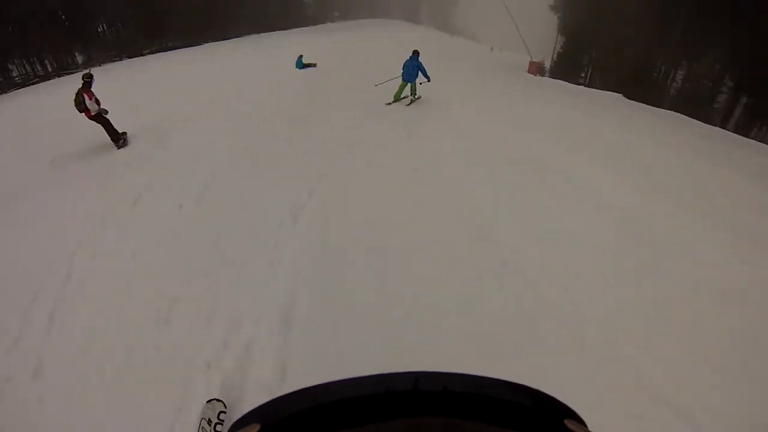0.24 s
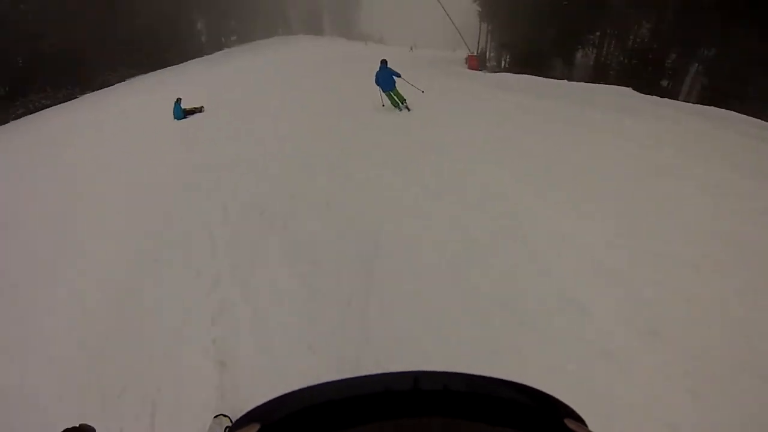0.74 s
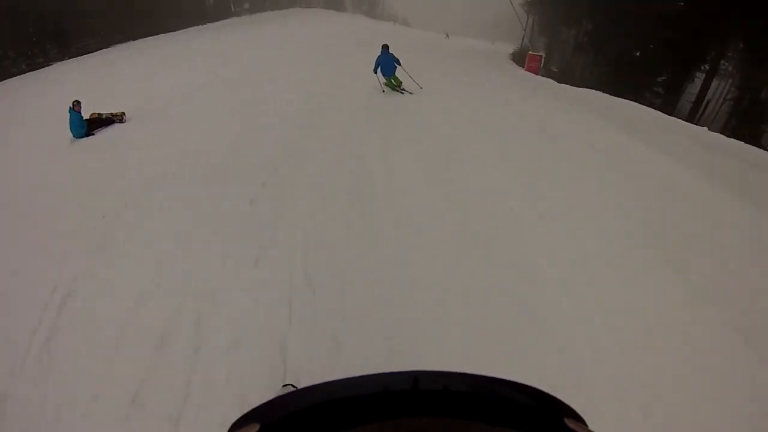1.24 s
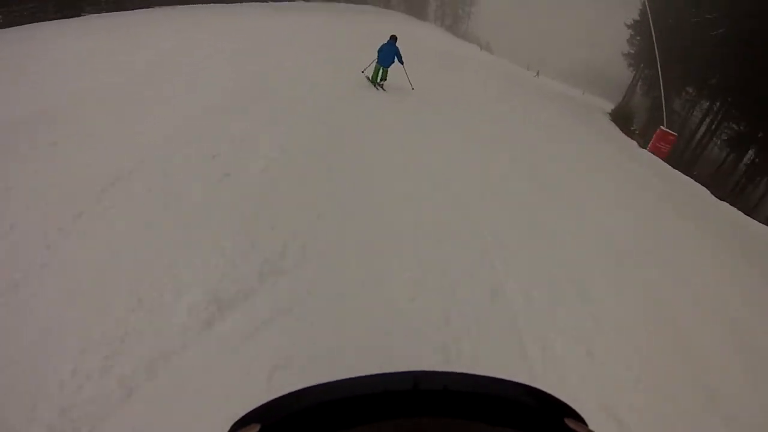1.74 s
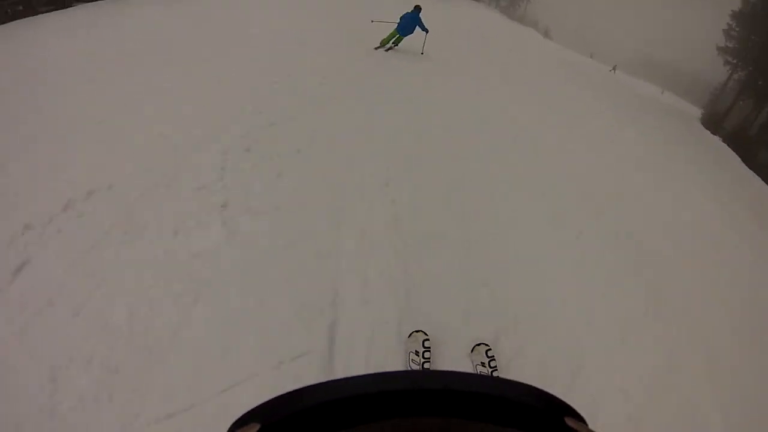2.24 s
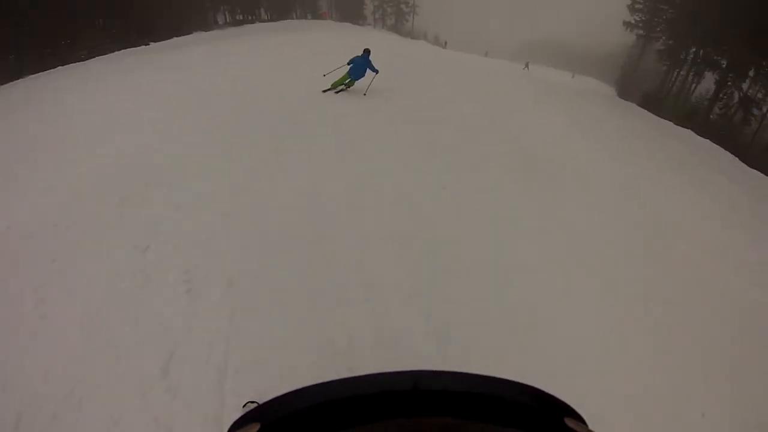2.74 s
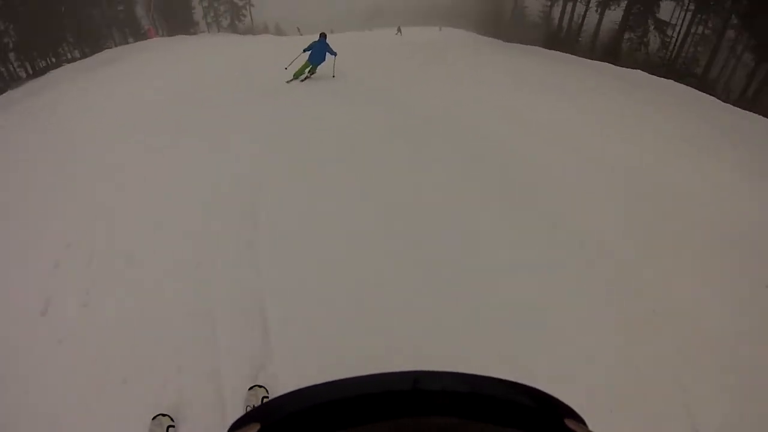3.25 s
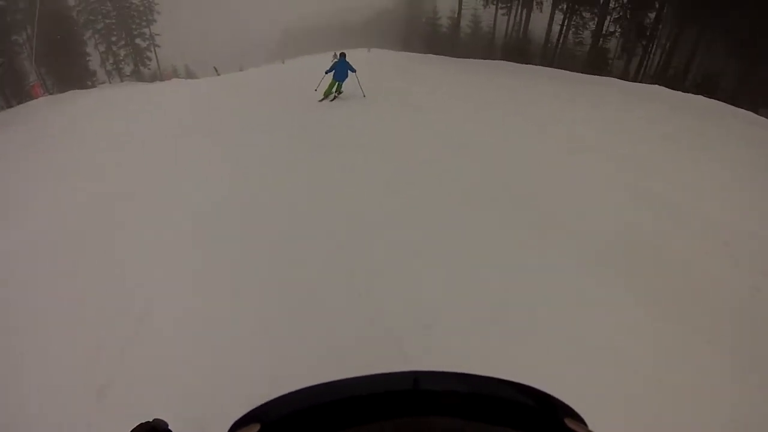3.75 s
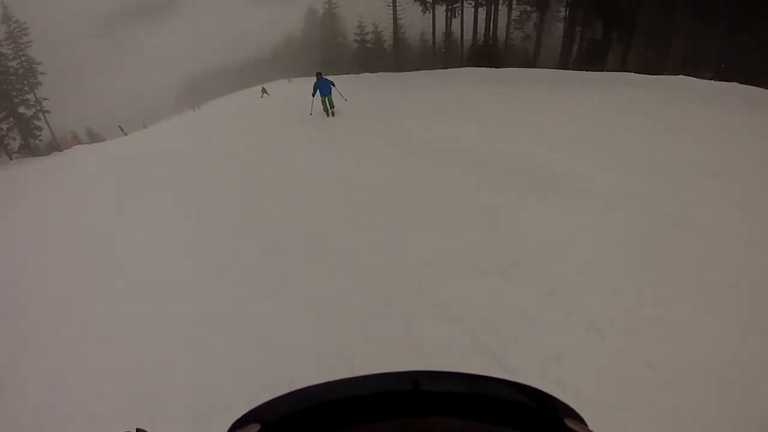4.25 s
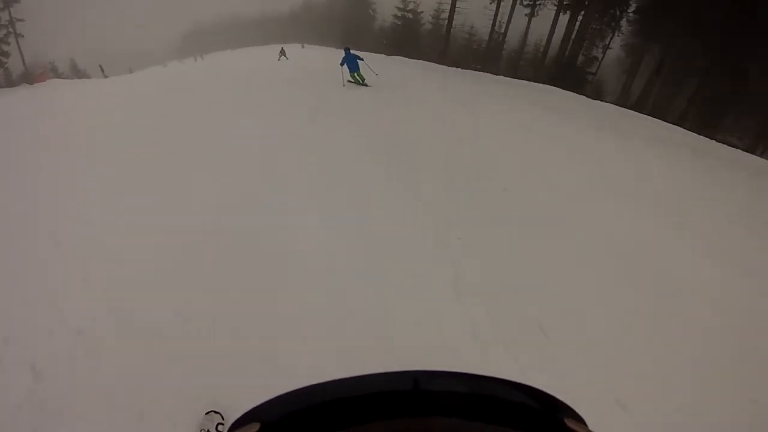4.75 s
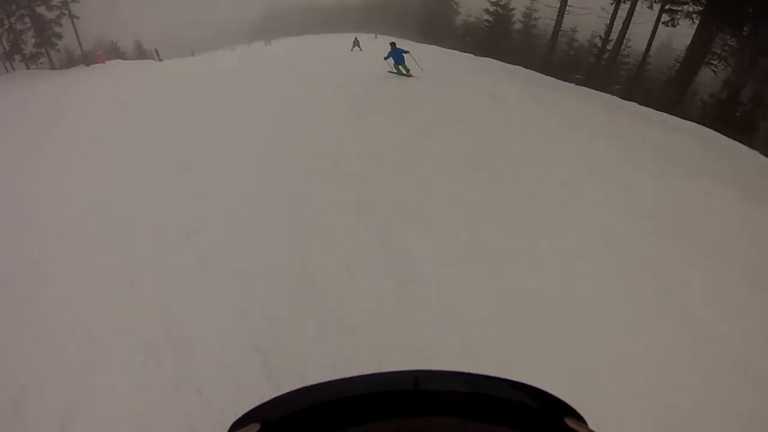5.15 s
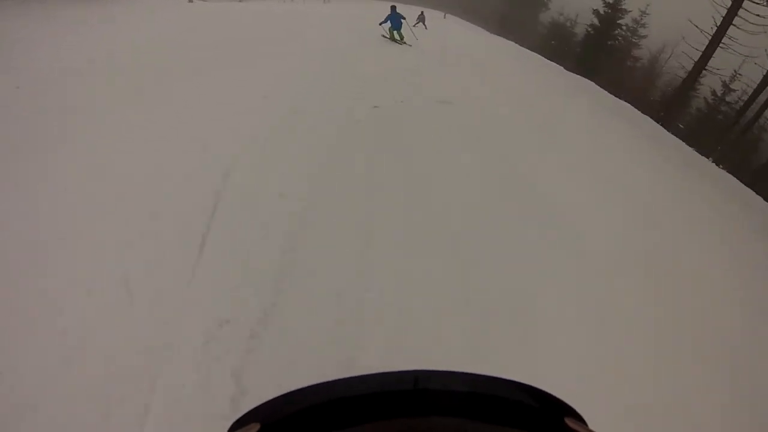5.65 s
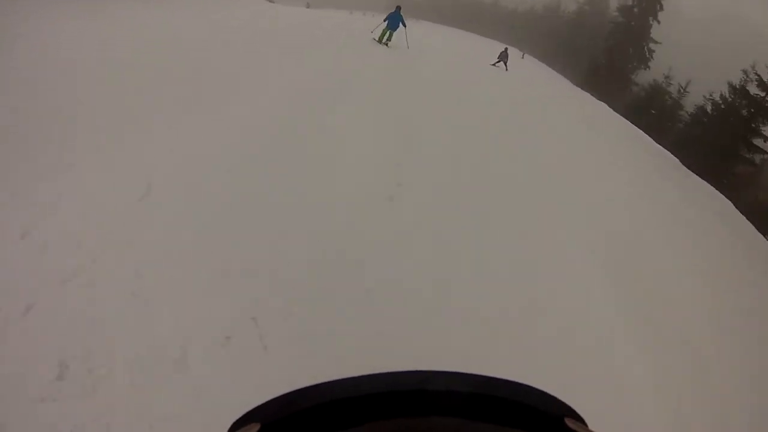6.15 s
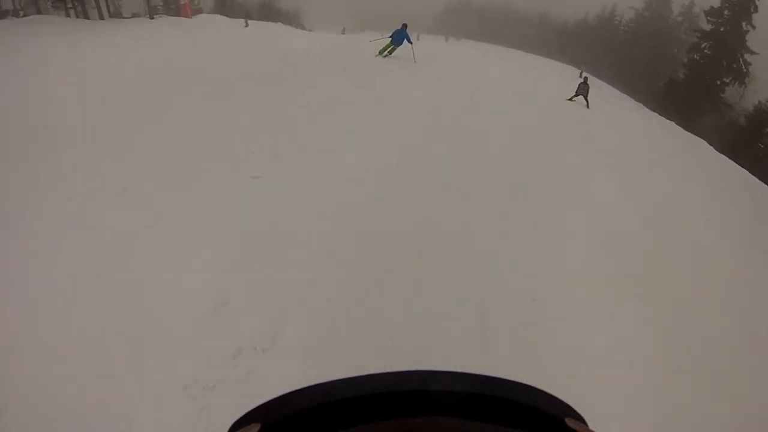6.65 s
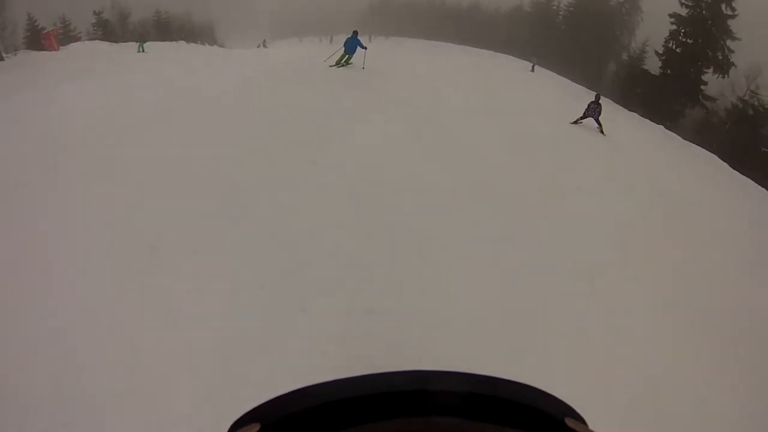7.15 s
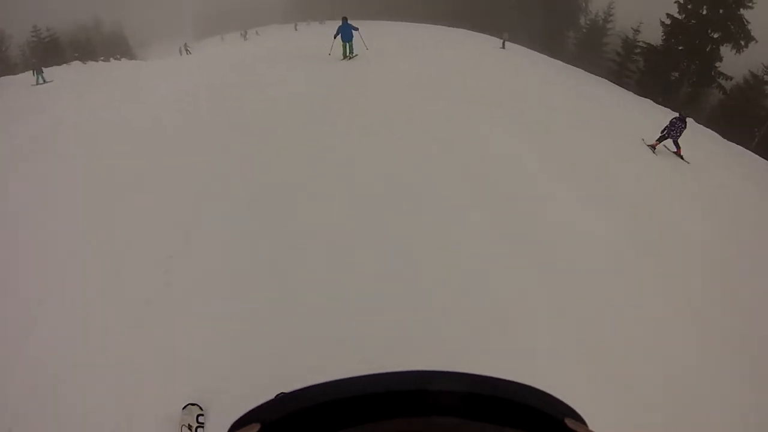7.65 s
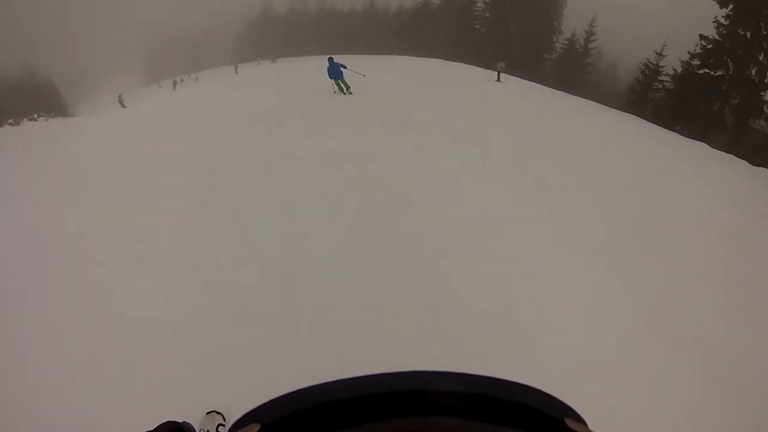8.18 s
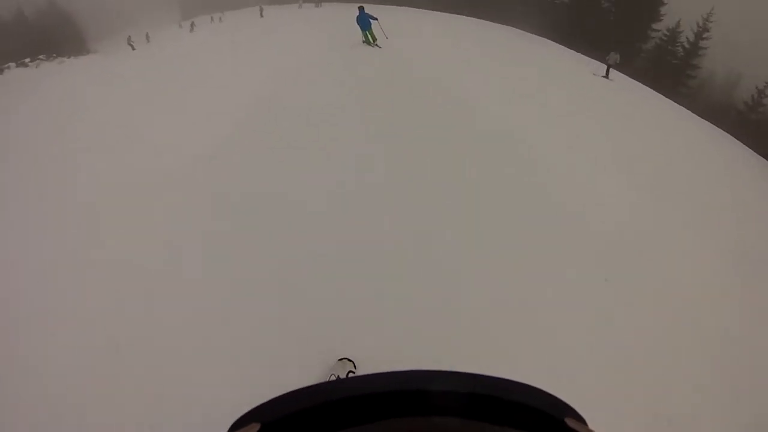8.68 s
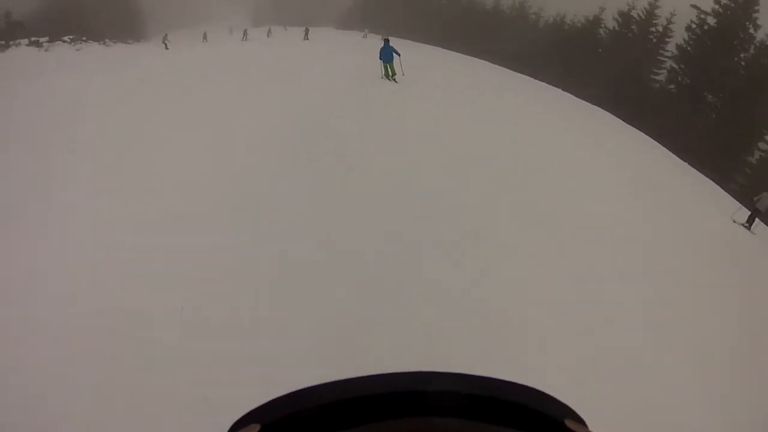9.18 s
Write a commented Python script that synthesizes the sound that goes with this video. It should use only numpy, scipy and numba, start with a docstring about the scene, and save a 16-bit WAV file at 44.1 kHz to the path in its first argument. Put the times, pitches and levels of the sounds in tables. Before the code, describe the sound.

A fast ski run on packed snow, heard from a camera in a closed case on the skier's helmet. The edges scrape and hiss without a break, sounding boxy and swelling briefly in the skids. Wind rumbles and shakes the mount, and irregular low thumps overload the microphone, making the sound dip and swell back. The thumps crowd together in the first four seconds, then come further apart. A faint hum and tiny ticks lie underneath.

```python
"""A slope of packed snow: a fast ski run, heard from a camera in a closed case on the skier's helmet.
Edges crush snow grains, scraping and hissing through the case's resonances; the bases scuff soft snow.
Wind buffets the case, shakes the mount, moans and makes the helmet shell hum; small ticks and sizzles
come through. Gusts and bumps jolt the case and overload the recorder: its stepped limiter ticks,
ducks the sound and lets it swell back."""
import sys
import numpy as np
from scipy import signal
from scipy.fft import rfft, irfft, next_fast_len
from scipy.io import wavfile
from scipy.ndimage import uniform_filter1d
from numba import njit

SR = 44100
rng = np.random.default_rng(int(sys.argv[2]) if len(sys.argv) > 2 else 0)


def dump_mix(stems):
    """Bounce the given channels to the path in sys.argv[1] as a 16-bit WAV at rate SR."""
    frames = np.atleast_2d(stems).T  # one column per channel
    limited = np.clip(frames, -1, 1)  # hard clip at full scale
    pcm = np.round(limited * 32767).astype(np.int16)
    wavfile.write(sys.argv[1], SR, pcm)


N = 415422
TIME_S = np.arange(N) / SR
BINS_HZ = np.fft.rfftfreq(next_fast_len(N), 1 / SR)

# Edge pressure on the snow. Each row: time in seconds, scrape level in dB, fizz re scrape in dB.
EDGE_PRESSURE = [(0.0, -34.5, -17), (0.38, -35.5, -14.5), (0.47, -38, -16), (0.95, -38, -17),
                 (1.63, -33.5, -15.5), (2.36, -37, -16.5), (2.61, -34.5, -16.5), (3.12, -37.5, -15.5),
                 (3.25, -42, -14), (4.03, -39.5, -15), (4.76, -37.5, -17), (5.35, -39.0, -16.5),
                 (6.42, -34.5, -17), (6.89, -38.7, -16.1), (7.23, -37.0, -17.5), (7.48, -39.3, -19),
                 (7.59, -35.5, -16.5), (9.42, -38.5, -17)]
# Skids as an edge is set. Each row: time in seconds, lift in dB.
EDGE_SKIDS = [(.63, 4), (1.16, 3.5), (3.35, 4.5), (3.64, 3.5), (4.92, 0.5), (5.04, 2), (5.92, 2.5),
              (7.04, 1.5), (8.28, 3), (9.41, 2)]
# Edge bite, positive when carving, negative on flat skis. Each row: time in seconds, bite in dB.
EDGE_BITE = [(0, -3.5), (1.15, -1.5), (1.45, 2.5), (2.5, 2), (2.9, -4), (3.8, -1.5), (4.95, -1.5),
             (5.25, 2), (6.1, 1.5), (7.1, 2.5), (7.45, -1.5), (8.15, -3), (8.65, 3), (9.42, -0.5)]
# Hardest carve, ringing the case's main resonance. Each row: time in seconds, lift in dB.
HARD_CARVE = [(6.25, 2.5)]
# Snow scrape through the case. Each row: frequency in Hz, relative density in dB.
SCRAPE_SPECTRUM = [(120, -18.5), (300, -14), (620, -14), (1050, -14), (1220, -6), (1520, -2.5), (1780, -8),
                   (2850, -14.5), (3330, -13.5), (3600, -21.5), (6900, -28), (8000, -33.5), (9800, -40.5),
                   (15500, -41.5)]
# Case resonances. Each row: frequency in Hz, width in Hz, lift in dB.
CASE_MODES = [(755, 72, 6.5), (943, 37, 7.5), (1139, 27, 9.5), (1357.5, 53, 2.5), (1521, 280, 2.5),
              (2080, 18, 0.5), (2393, 340, 6.5), (3046, 40, 5.5), (4380, 140, 4), (5032, 570, 6.5),
              (6590, 500, 3), (10700, 1500, 4)]
# Airstream on the helmet. Each row: time in seconds, relative shudder level in dB.
AIRSTREAM = [(0.0, -33), (1.2, -25.5), (1.33, -38), (1.63, -34), (3.63, -27), (4.11, -33.5), (4.28, -27),
             (4.45, -32.5), (6.3, -30), (6.59, -36.5), (6.9, -27.5), (8.43, -33), (8.56, -24.5),
             (9.42, -30)]
# Gusts shaking the mount. Each row: time in seconds, lift in dB.
WIND_GUSTS = [(.32, 5), (.87, 5), (2.14, 9), (2.54, 8), (3.8, 6), (4.68, 4), (7.3, 3.5), (8.3, 6.5),
              (8.88, 3)]
# Lulls in the wind. Each row: time in seconds, change of rumble in dB.
WIND_LULLS = [(1.88, -2.5), (4.08, -8.5), (4.92, -7.5), (5.79, -9)]
# Slow heave of the air. Each row: frequency in Hz, relative density in dB.
HEAVE_SPECTRUM = [(1, -48.5), (4, -2), (9, 4), (14, 10.5), (20, 1.5), (28, -4.5), (40, -28), (80, -60)]
# Shaking mount. Each row: frequency in Hz, relative density in dB.
SHUDDER_SPECTRUM = [(20, -30), (32, -5), (39, -3.5), (44, 1.5), (48, 2), (53, -11), (66, -28), (140, -85)]
# Eddies on the case. Each row: frequency in Hz, relative density in dB.
EDDY_SPECTRUM = [(35, -5.5), (60, -5.5), (75, -4), (100, -10.5), (140, -12.5), (172, -9.5), (215, -17.5),
                 (320, -23.5), (600, -38.5), (2000, -85)]
# Eddy strength. Each row: time in seconds, relative level in dB.
EDDY_LEVELS = [(0.0, -44.5), (1.41, -48.5), (2.57, -44), (2.66, -48), (3.04, -50.0), (3.57, -44.5),
               (5.26, -46.5), (5.36, -49), (5.82, -50.7), (6.13, -46.8), (7.32, -44), (7.96, -44),
               (8.05, -48), (8.99, -45.6), (9.08, -49.9), (9.42, -44)]
# Swells of shell hum. Each row: start in seconds, length in seconds, relative level in dB.
HUM_SWELLS = [(0.06, 0.12, -39), (0.892, 0.053, -38), (1.697, 0.084, -38.5), (2.433, 0.12, -41.5),
              (3.365, 0.043, -41), (3.617, 0.22, -42.5), (3.943, 0.42, -40.5), (4.925, 0.13, -39),
              (6.29, 0.19, -38.5), (6.843, 0.24, -42.5), (7.265, 0.13, -36), (7.866, 0.074, -43),
              (8.054, 0.13, -40), (8.973, 0.044, -41)]
# Faint background hiss. Each row: frequency in Hz, relative density in dB.
FLOOR_SPECTRUM = [(20, 11.5), (250, 8.5), (500, -29), (1200, -26), (4500, -38), (7000, -31), (11000, -24.5),
                  (16000, -28)]
# Gusts and bumps shoving the case. Each row: start in seconds, signed peak of each thump.
CASE_JOLTS = [(0.139, .42), (.365, 1.04), (.669, 0.72), (1.028, 0.76), (2.054, -0.25), (2.089, .42),
              (2.26, -0.28), (2.793, 0.61), (2.941, 0.44), (3.14, 0.54), (3.217, 0.47), (3.386, 0.54),
              (3.434, -0.68), (3.468, .62), (3.681, .58), (3.776, .3), (4.36, 0.91), (4.775, 0.95),
              (5.623, -0.47), (5.656, 0.55), (6.075, 0.49), (8.29, -0.32), (8.327, 0.81), (8.539, 0.52),
              (8.67, -0.43), (9.317, 0.4)]
# Small dry ticks. Each row: start in seconds, peak in dB.
DRY_TICKS = [(.501, -47.5), (1.014, -41), (1.02, -40.5), (2.066, -39), (2.822, -41), (3.204, -39),
             (3.791, -40), (8.68, -39), (9.276, -39)]
# Thin treble sizzles. Each row: centre in seconds, length in seconds, relative level in dB.
TREBLE_SIZZLES = [(0.777, 0.035, -68), (6.465, .055, -65), (8.16, 0.041, -65)]
# Ski bases on soft snow. Each row: centre in seconds, level in dB.
BASE_SCUFFS = [(2.54, -55), (4.58, -53), (4.74, -53), (5.04, -51), (5.22, -50), (7.52, -56), (7.76, -52),
               (8.52, -51), (9.28, -51)]


def gain_of(db):
    return 10 ** (np.asarray(db) / 20)


def unit_rms(x):
    return x / np.sqrt(np.mean(x ** 2) + 1e-20)


def curves(rows):
    """Each value column, linear in time."""
    times_s, *columns = np.transpose(rows)
    return [np.interp(TIME_S, times_s, column) for column in columns]


def swells(rows, width_s):
    """A Gaussian hump per (time, height) row."""
    return sum(height * np.exp(-((TIME_S - at_s) / width_s) ** 2) for at_s, height in rows)


def spectrum(points):
    """Gain per bin, interpolated in log frequency, zero above the last point."""
    hz, db = np.transpose(points)
    return gain_of(np.interp(np.log(BINS_HZ + 1e-3), np.log(hz), db)) * (BINS_HZ <= hz[-1])


def bell(hz, width_hz):
    """Resonance curve, 1 at its centre."""
    return 1 / (1 + (2 * (BINS_HZ - hz) / width_hz) ** 2)


def filtered(x, bin_gain):
    size = next_fast_len(N)
    return irfft(rfft(x, size) * bin_gain, size)[:N]


def noise(bin_gain):
    return unit_rms(filtered(rng.standard_normal(N), bin_gain))


def flutter(rate_hz):
    return noise(np.exp(-(BINS_HZ / rate_hz) ** 2))


def steadied(x, window_s):
    """Removes slow swells, keeps quick ones."""
    size = max(int(window_s * SR), 2)
    return x / np.sqrt(uniform_filter1d(uniform_filter1d(x ** 2, size), size) + 1e-9)


def add(mix, start_s, sound):
    part = mix[max(round(start_s * SR), 0):][:len(sound)]
    part += sound[:len(part)]


def skis(chatter_db=0.43, patch_db=0.59, grain_db=-6, grains_per_s=1500, spray_db_per_peak=0.5):
    """Edges crush snow grains and chatter over ridges; the case colours the sound."""
    level_db, fizz_db = curves(EDGE_PRESSURE)
    skid_db = swells(EDGE_SKIDS, width_s=0.064)
    bite_db, = curves(EDGE_BITE)
    grains = rng.standard_normal(N) * (rng.random(N) < grains_per_s / SR)
    crush = rng.standard_normal(N) + gain_of(grain_db) * unit_rms(grains)
    crush *= gain_of(chatter_db * flutter(rate_hz=24))
    mode_lift_db = sum(db * bell(hz, width_hz) for hz, width_hz, db in CASE_MODES)
    case = spectrum(SCRAPE_SPECTRUM) * gain_of(mode_lift_db)
    highpass = 1 / (1 + (3500 / (BINS_HZ + 1)) ** 12)
    lowpass = 1 / np.sqrt(1 + (BINS_HZ / 13000) ** 10)
    scrape = unit_rms(filtered(crush, case * (1 - highpass)))
    # A biting edge rasps; a flat base swishes.
    rasp = filtered(scrape, bell(hz=767, width_hz=230) + gain_of(5) * bell(hz=3300, width_hz=240))
    swish = filtered(scrape, bell(hz=2564, width_hz=570))
    scrape += (gain_of(bite_db) - 1) * rasp + (gain_of(-0.5 * bite_db) - 1) * swish
    ring = filtered(scrape, bell(hz=1420, width_hz=280))
    scrape += (gain_of(swells(HARD_CARVE, width_s=0.5)) - 1) * ring
    scrape *= gain_of(0.01 + patch_db * flutter(rate_hz=21))  # patches of hard snow
    spray_db = spray_db_per_peak * swells(np.abs(CASE_JOLTS), width_s=0.046)  # jolts kick up fine snow
    fizz = unit_rms(filtered(crush, case * highpass * lowpass)) * gain_of(0.36 + fizz_db + spray_db)
    return gain_of(level_db + skid_db) * (scrape + fizz)


def wind(jolt_activity, heave_db=-19, shudder_db=1.5, buffet_db=6, flare_db=1.5, rumble_cap=0.26):
    """Turbulence heaves the case and shakes its mount; jolts override this rumble and flare the eddies."""
    air_db = curves(AIRSTREAM)[0] + swells(WIND_GUSTS, width_s=0.11)
    lull_db = swells(WIND_LULLS, width_s=0.11)
    heave = steadied(noise(spectrum(HEAVE_SPECTRUM)), window_s=0.088)
    heave *= gain_of(heave_db + 0.15 * (air_db - air_db.mean()))
    shudder = steadied(noise(spectrum(SHUDDER_SPECTRUM)), window_s=0.19)
    shudder *= gain_of(shudder_db + air_db)
    rumble = (heave + shudder) * gain_of(lull_db)
    rumble /= (1 + (rumble / rumble_cap) ** 4) ** (1 / 4)  # softly capped below the limiter's ceiling
    eddies = steadied(noise(spectrum(EDDY_SPECTRUM)), window_s=0.06)
    eddies *= gain_of(2 * flutter(rate_hz=35))
    eddy_db = buffet_db + curves(EDDY_LEVELS)[0] + flare_db * jolt_activity + 0.31 * lull_db
    return (1 - jolt_activity) * rumble + gain_of(eddy_db) * unit_rms(eddies)


def shell_hum(rest_db=-52, trim_db=-1.5, ramp_s=0.042):
    """The helmet shell hums faintly throughout and swells when the air catches it."""
    level = gain_of(rest_db)
    for start_s, length_s, db in HUM_SWELLS:
        inside_s = np.minimum(TIME_S - start_s, start_s + length_s - TIME_S)
        envelope = np.clip(0.5 + inside_s / ramp_s, 0, 1)
        level = np.maximum(level, gain_of(db + trim_db) * envelope)
    return level * steadied(noise(bell(hz=123.5, width_hz=4.1)), window_s=0.15)


def air_moan(rest_db=-53, rise_db=4):
    """Air moans past the case; mid-run it grows and a faint whistle joins."""
    whistle_db = np.interp(TIME_S, [2.6, 3.1, 4.0, 4.6, 5.0], [-81, -61.5, -62, -62, -87.5])
    moan = noise(bell(hz=1135, width_hz=30) + gain_of(-8) * bell(hz=935, width_hz=30))
    moan *= gain_of(rest_db + rise_db * gain_of(whistle_db - whistle_db.max()))
    whistle = gain_of(whistle_db) * noise(bell(hz=3773, width_hz=83))
    return moan + whistle


def floor_hiss(level_db=-58):
    """Faint steady noise, independent per channel."""
    return gain_of(level_db) * np.array([noise(spectrum(FLOOR_SPECTRUM)) for _ in range(2)])


def jolts(swing_hz=12.5, decay_s=0.022, rise_s=0.0125, highpass_hz=1.6):
    """One heavily damped pressure swing per shove. Returns pressure and activity, 0 to 1."""
    age_s = np.arange(SR // 4) / SR
    onset = 1 - np.exp(-(age_s / rise_s) ** 2)
    swing = np.sin(2 * np.pi * swing_hz * age_s) * np.exp(-age_s / decay_s) * onset
    pressure, activity = np.zeros(N), np.zeros(N)
    for start_s, peak in CASE_JOLTS:
        add(pressure, start_s, peak * swing / swing.max())
        add(activity, start_s, np.exp(-(age_s / decay_s) ** 2))
    # High-pass keeps the low thumps centred on zero.
    pressure = filtered(pressure, BINS_HZ / np.hypot(BINS_HZ, highpass_hz))
    return pressure, np.minimum(uniform_filter1d(activity, SR // 60), 1)


def ticks(decay_s=0.00052):
    """Unpitched clicks, a millisecond or two each."""
    age_s = np.arange(SR // 200) / SR
    out = np.zeros(N)
    for start_s, peak_db in DRY_TICKS:
        click = rng.standard_normal(len(age_s)) * np.exp(-age_s / decay_s)
        add(out, start_s, gain_of(peak_db) * click / abs(click).max())
    return out


def sizzles(trim_db=1):
    """Brief bursts of thin treble noise."""
    envelope = sum(swells([(at_s, gain_of(db + trim_db))], width_s=length_s / 2)
                   for at_s, length_s, db in TREBLE_SIZZLES)
    return envelope * noise(bell(hz=10800, width_hz=1300) ** 2)


def scuffs():
    """Ski bases brush soft snow: puffs of low, broad noise."""
    envelope = swells([(at_s, gain_of(db)) for at_s, db in BASE_SCUFFS], width_s=0.045)
    return envelope * noise(bell(hz=430, width_hz=420) ** 2)


def scene():
    """All sources alike in both channels, over stereo hiss."""
    hiss = floor_hiss()
    snow = skis() + scuffs()
    jolt_pressure, jolt_activity = jolts()
    air = wind(jolt_activity) + shell_hum() + air_moan()
    return hiss + snow + air + jolt_pressure + sizzles() + ticks()


@njit
def limiter_db(magnitude, jitter, ceiling, step_db, attack_step_s, hold_s, release_step_s):
    """Gain steps down fast while the held output peak exceeds the ceiling, then slowly back up."""
    out = np.zeros(len(magnitude))
    db, gain, waited_s, stretch, held_peak = 0., 1., 0., 1., 0.
    for i in range(len(magnitude)):
        waited_s += 1 / SR
        held_peak = max(magnitude[i] * gain, held_peak * (1 - 1 / (hold_s * SR)))
        load = held_peak / ceiling
        interval_s = attack_step_s / load ** 2 if load > 1 else release_step_s
        if waited_s > stretch * interval_s:
            db = db - step_db if load > 1 else min(db + step_db, 0.)
            gain = 10 ** (db / 20)
            waited_s, stretch = 0., jitter[i]
        out[i] = db
    return out


def record(dry, cutoff_hz=15400):
    """Each channel's stepped limiter ticks on a big swing and ducks what follows; then a low-pass."""
    jitter = rng.uniform(0.3, 1.7, dry.shape)
    gain_db = np.array([limiter_db(abs(channel), channel_jitter, ceiling=0.28, step_db=0.24,
                                   attack_step_s=0.00048, hold_s=0.028, release_step_s=0.002)
                        for channel, channel_jitter in zip(dry, jitter)])
    lowpass = signal.firwin(511, cutoff_hz, window=("kaiser", 9), fs=SR)
    return signal.oaconvolve(dry * gain_of(gain_db), lowpass[None], "same")


dry = scene()
out = record(dry)
dump_mix(out)
```